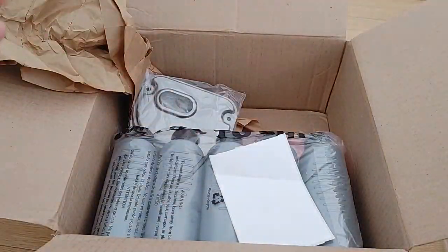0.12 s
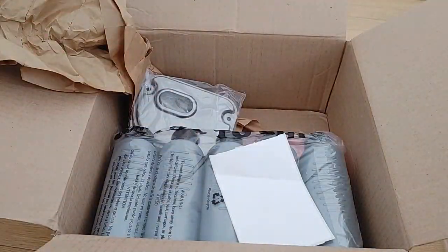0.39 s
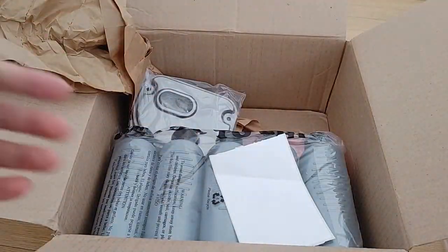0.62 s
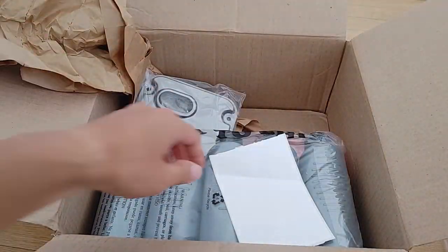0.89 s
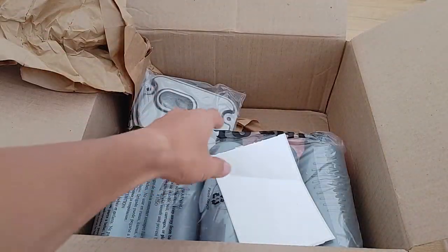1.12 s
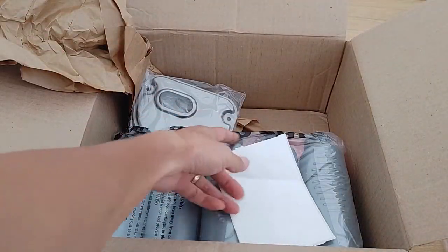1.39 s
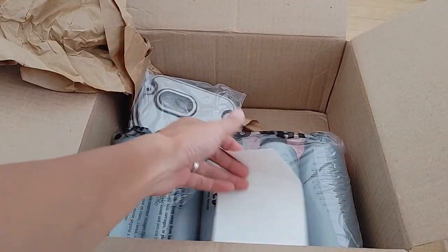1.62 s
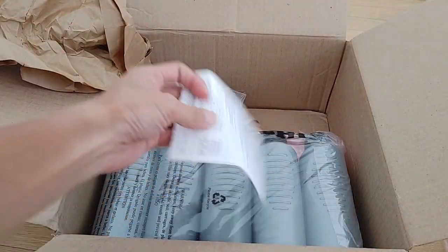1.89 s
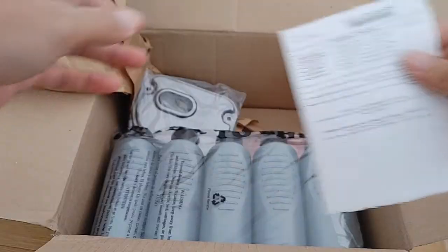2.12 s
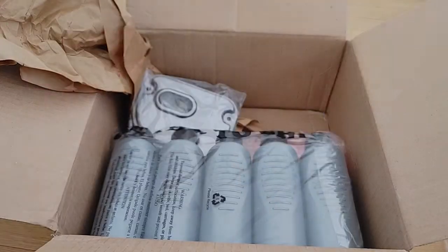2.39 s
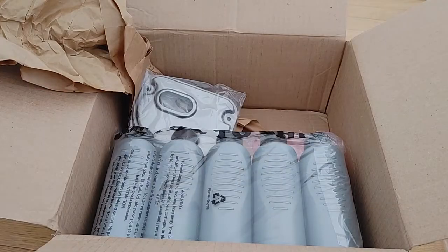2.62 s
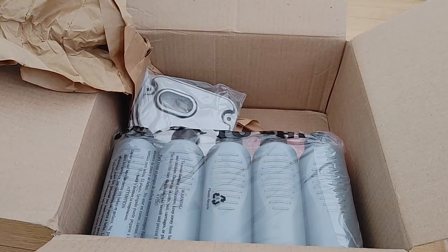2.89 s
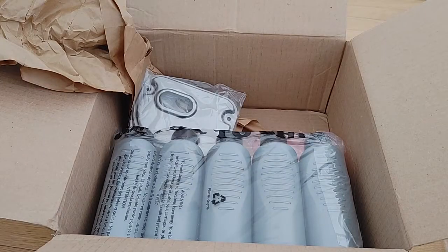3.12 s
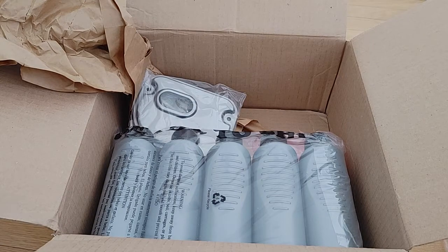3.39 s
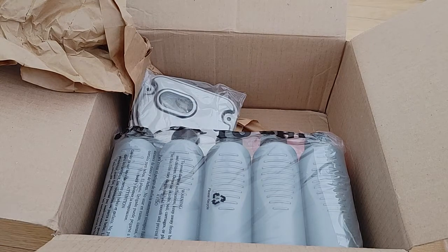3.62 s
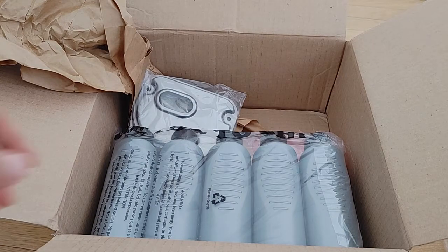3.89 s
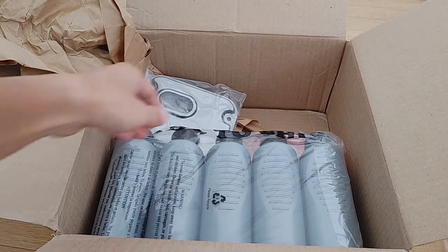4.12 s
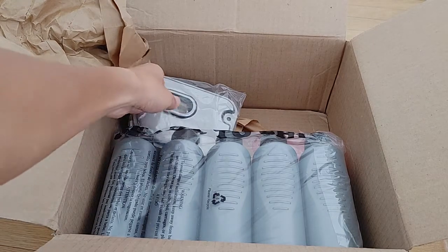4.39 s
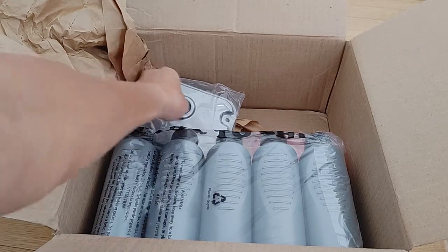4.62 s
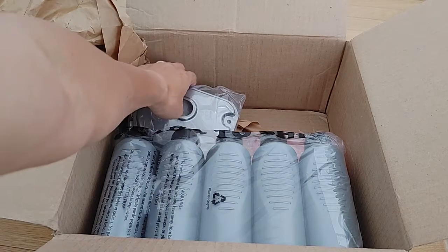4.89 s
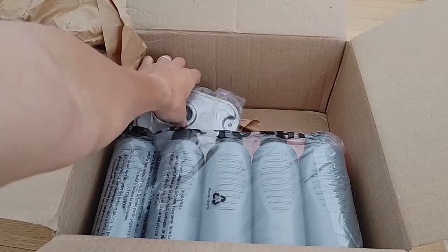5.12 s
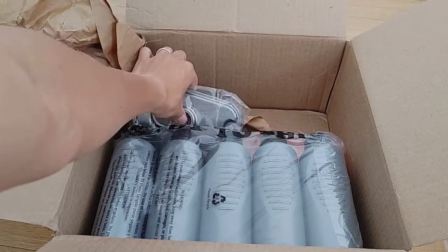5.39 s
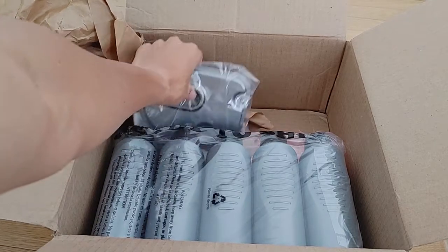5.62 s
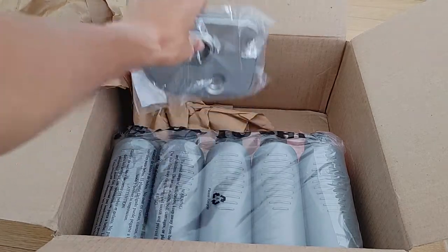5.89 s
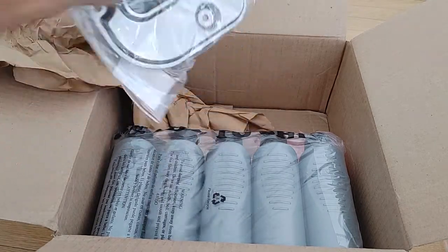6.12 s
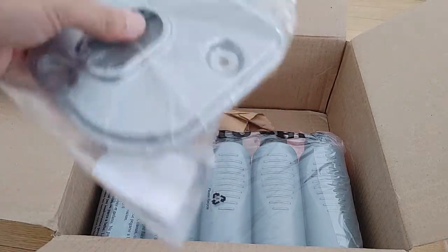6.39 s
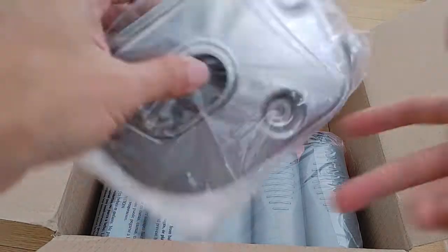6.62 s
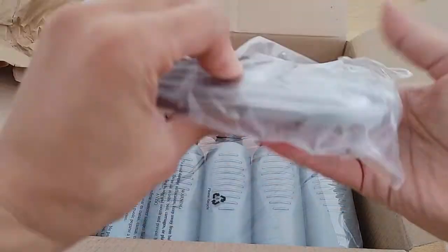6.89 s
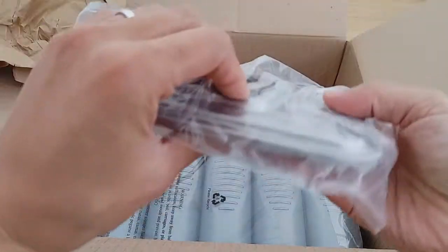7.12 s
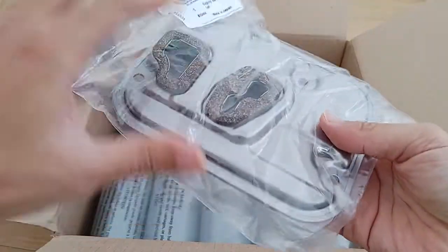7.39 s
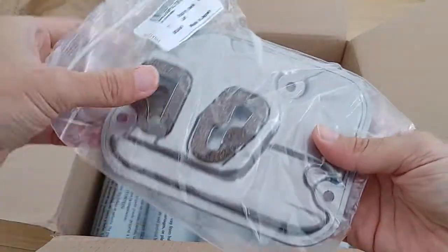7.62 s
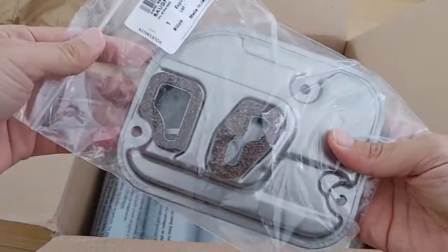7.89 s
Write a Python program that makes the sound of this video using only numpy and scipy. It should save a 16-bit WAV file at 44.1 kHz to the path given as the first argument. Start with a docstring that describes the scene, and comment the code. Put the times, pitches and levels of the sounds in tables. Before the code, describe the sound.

A close stereo microphone in a small room with quiet hush underneath. From 0 to 1.6 s thin paper crinkles in short, bright, dry bursts with sharp snaps, strongest around 0.4 and 1.25 s; two low, soft cardboard knocks come at about 0.55 and 0.6, and a weaker one near 1.7. The rustle fades by 2.3. In the lull, faint clicks sound further away at 2.5 and 2.85, then a clearer click with a brief scrape near 3.7. From 4.4 to 5.9 thin plastic crinkles more densely and fully, over resonant cardboard rubbing and hollow bumps, heaviest around 4.85 and 5.27, with a strong crackle at 5.8. It eases, and a low air puff passes at 6.3. From 6.5 to 8 plastic crinkles in separate bursts, with soft dull taps on the metal part, mainly 6.85 to 7.35, and a sharp snap at 7.73.

```python
"""Hands lift a paper slip and then a bagged metal part out of a cardboard box, close to a two-port microphone.
Paper crinkles and snaps first, as swarms of short resonant noise bursts, while knocks ring the box modes.
Then things set down further off click and scrape in a small room; bumps thump in decaying sine groups.
At the end fingertips ring the modes of the bagged part amid more crinkle. Throughout, rubbing rumbles as
resonated impulses, puffs of moved air press on the ports as low noise, and a quiet hush lies beneath."""
import sys
import numpy as np
from scipy import signal
from scipy.fft import rfft, irfft
from scipy.io import wavfile
from scipy.ndimage import uniform_filter1d

SR = 44100
rng = np.random.default_rng(int(sys.argv[2]) if len(sys.argv) > 2 else 0)


def volts_from_db(level):
    """Convert decibel levels to linear amplitude ratios."""
    exponent = np.asarray(level, float) / 20
    return 10 ** exponent


def generate_wav(signal):
    """Clip the signal to [-1, 1] and save it as 16-bit WAV at the path in sys.argv[1]."""
    frames = np.transpose(np.atleast_2d(signal))
    scaled = np.clip(frames, -1, 1) * 32767
    pcm = np.round(scaled).astype(np.int16)
    wavfile.write(sys.argv[1], SR, pcm)


N = 353241
T = np.arange(N) / SR


def evened(x):
    """Normalisation: scales to rms 1."""
    return x / np.sqrt(np.mean(x ** 2) + 1e-20)


def read(points, hz):
    """Linear interpolation of a spectrum on a log-frequency axis."""
    f, value = np.transpose(points)
    return np.interp(np.log(hz + 1), np.log(f + 1), value)


def curve(rows, column):
    """Linear interpolation of one table column, sample by sample."""
    rows = np.transpose(rows)
    return np.interp(T, rows[0], rows[column])


def add(mix, s, sound):
    """Superposition: lays a sound into a track at second s."""
    part = mix[..., round(s * SR):][..., :sound.shape[-1]]
    part += sound[..., :part.shape[-1]]


def band(x, lo_hz, hi_hz):
    """Band-pass filtering."""
    sos = signal.butter(3, [lo_hz, min(hi_hz, .45 * SR)], "bandpass", fs=SR, output="sos")
    return signal.sosfilt(sos, x)


def above(x, edge_hz):
    """Zero-phase high-pass with a soft edge; x minus it is the part under the edge."""
    return irfft(rfft(x) / (1 + (edge_hz / (np.fft.rfftfreq(N, 1 / SR) + 1)) ** 8), N)


def resonate(x, hz, width_hz):
    """Heterodyne resonator: shifts the curve hz down to zero, smooths, and shifts back."""
    turn = np.exp(2j * np.pi * np.cumsum(hz) / SR)
    r = np.exp(-np.pi * width_hz / SR)
    return 2 * (turn * signal.lfilter([1 - r], [1, -r], x / turn)).real


def sides(x, pan_db):
    """Level-difference panning: splits the left-right difference over both ports."""
    return x * volts_from_db(np.multiply.outer([.5, -.5], pan_db * np.ones(x.shape[-1])))


def strokes(rows, rise_db_per_s, fall_db_per_s):
    """Exponential envelopes: the power of each row swells up to its start, holds, then dies away."""
    step = T[::64]
    power = []
    for s, hold, db, *_ in rows:
        rise_db = rise_db_per_s * np.maximum(s - step, 0)
        fall_db = fall_db_per_s * np.maximum(step - s - hold, 0)
        power.append(volts_from_db(2 * (db - rise_db - fall_db)))
    return step, np.array(power) + 1e-14


def pair(spectrum_db, likeness):
    """Partial coherence: two-port noise of a given colour and likeness, rms 1."""
    hz = np.fft.rfftfreq(2048, 1 / SR)
    a, b, c, d = rng.standard_normal((N // 512 + 5, 1025, 4)).T
    same = np.clip(read(likeness, hz), -1, 1)[:, None]
    left = a + 1j * b
    right = same * left + np.sqrt(1 - same ** 2) * (c + 1j * d)
    z = np.array([left, right]) * volts_from_db(read(spectrum_db, hz))[:, None]
    return evened(signal.istft(z, nperseg=2048, noverlap=1536)[1][:, :N])


def crack(hz, noise, t60, q, wide):
    """Buckling crease as an excited resonator: a dying noise burst, partly ringing at one pitch."""
    t = np.arange(len(noise)) / SR
    burst = noise * volts_from_db(-60 * t / t60) * np.minimum(t / 0.00086, 1) ** 2
    ring = signal.lfilter(*signal.iirpeak(min(hz, .45 * SR), q, SR), burst)
    sound = evened(ring) + wide * evened(band(burst, 370, 15200))
    return sound / abs(sound).max()


# colour of the background noise: (frequency [Hz], relative density [dB])
HUSH_COLOUR = [(25, -31), (120, -24.5), (240, -26.5), (300, -15), (420, -26.5), (2400, -34.5), (7000, -48),
               (11000, -47.5), (16000, -33)]
# likeness of the two ports: (frequency [Hz], left-right likeness [0 to 1])
HUSH_LIKENESS = [(40, 0.6), (300, 0.7), (2400, 0.0357)]


def hush(level_db=-68.5):
    """Stationary noise, coherent between the ports in the bass and nearly independent in the treble."""
    return volts_from_db(level_db) * pair(HUSH_COLOUR, HUSH_LIKENESS)


# how fast the room dies away: (frequency [Hz], t60 [s])
ROOM_DECAY = [(500, 0.3), (4600, 0.27), (12000, 0.045)]


def room(x):
    """Reverberation by sparse random-sign echoes, one in every 20 samples, each band dying at its own speed."""
    echoes = np.zeros((2, SR // 2))
    at = np.arange(200, SR // 2 - 20, 20)
    at = at + rng.integers(0, 20, (2, len(at)))
    np.put_along_axis(echoes, at, rng.choice([-1., 1.], at.shape), 1)
    hz, t, z = signal.stft(echoes, SR, nperseg=256)
    decay = volts_from_db(-60 * t / read(ROOM_DECAY, hz)[:, None])
    tail = signal.istft(z * decay, SR, nperseg=256)[1]
    return signal.fftconvolve(x[None], tail / np.linalg.norm(tail[0]), axes=1)[:, :N]


# air pushed on the ports: (start [s], hold [s], level [dB])
AIR_PUFFS = [(.56, 0.16, -63), (1.55, 0.19, -67.5), (4.74, 0.24, -68.5), (6.12, .14, -61.5),
             (6.28, 0.066, -49.5), (7.42, 0.5, -73.5)]


def puffs():
    """Pressure fluctuation of moved air: lumpy low-frequency noise, stronger on the right port."""
    step, power = strokes(AIR_PUFFS, rise_db_per_s=305, fall_db_per_s=271)
    air = pair([(15, -23), (40, -14.5), (100, -5.0), (140, -7.5), (300, -52.5)], [(20, 1.0), (100, 0.68)])
    return sides(np.interp(T, step, np.sqrt(power.sum(0))) * air, -7)


# things set down further off: (time [s], level [dB], pitch [Hz], wide-band share [ratio],
# level of the scrape that follows [dB], scrape length [s])
SET_DOWNS = [(2.504, -46.5, 2000, 0.063, -21, 0.069), (2.849, -37, 8600, 0.027, -48, 0.017),
             (3.674, -18.5, 2500, 4.5, -19, 0.14), (3.863, -48.5, 1900, 0.15, -5.5, 0.041)]


def far_clicks():
    """Impact, then friction: a click and a short dying scrape of the same colour that dulls as it fades."""
    out, t = np.zeros((2, N)), np.arange(SR // 4) / SR
    noises = rng.standard_normal((len(SET_DOWNS), 3, SR // 4))
    for (s, db, hz, wide, scrape_db, length), noise in zip(SET_DOWNS, noises):
        click = crack(hz, noise[0], 0.013, 12.0, wide)
        scrape = np.array([evened(crack(hz, n, 2.3, 1.4, wide)) for n in noise[1:]])
        scrape += (volts_from_db(-60 * t) - 1) * band(scrape, 6200, 20000)  # treble goes first
        fade = volts_from_db(scrape_db - 14 * t / length) / (1 + (t / length) ** 10)
        add(out, s, volts_from_db(db) * (click + scrape * fade))
    return out


# knocks on the box: (time [s], level [dB], frequency the blow excites most [Hz])
BOX_KNOCKS = [(.551, -4, 266), (0.599, -10, 300), (1.717, -21, 493)]
# modes of the box: (frequency [Hz], level [dB], t60 [s])
BOX_MODES = [(175.6, -1, 0.18), (238.8, -1, 0.17), (319.8, 1, 0.2), (357.3, 4.5, 0.1), (394, 14, 0.034),
             (501, 5.5, 0.14), (1120, 19.5, 0.026)]


def knocks():
    """Modal superposition: a soft blow rings the box modes near the pitch it excites most."""
    out, t = np.zeros(N), np.arange(SR // 2) / SR
    for s, db, best_hz in BOX_KNOCKS:
        ring = np.zeros(len(t))
        for hz, mode_db, t60 in BOX_MODES:
            off_db = 17.2 * np.log2(hz / best_hz) ** 2
            ring += volts_from_db(mode_db - off_db - 60 * t / t60) * np.sin(2 * np.pi * hz * t)
        add(out, s, volts_from_db(db) * ring * np.minimum(t / 0.0047, 1) / abs(ring).max())
    return sides(out, -0.51)


# each drag of hand or part along the box: (start [s], hold [s], drag strength [dB], panel pitch [Hz])
BOX_DRAGS = [(0, 1.5, -58.5, 354), (1.55, 0.089, -52.5, 300), (1.8, 0.12, -56.5, 300),
             (2.35, 0.34, -59.5, 720), (2.62, 0.29, -58, 730), (3.56, 0.3, -62, 410),
             (4.1, 0.053, -62, 700), (4.43, 0.18, -43, 555), (4.68, 0.19, -37.5, 617),
             (5.04, .12, -42.5, 572), (5.19, 0.118, -38.5, 624), (5.37, 0.07, -38.5, 601),
             (5.535, 0.12, -39, 560), (5.73, 0.086, -41, 560), (5.92, 0.5, -54, 349),
             (6.59, 0.035, -45, 700), (6.7, 0.034, -44, 750), (6.84, 0.16, -46, 753), (7.1, 0.32, -52, 780),
             (7.49, 0.13, -56, 300), (7.66, 0.035, -49, 850), (7.77, 0.16, -53.5, 251)]


def rumble(per_s=400, spread_db=3, lifted_s=6.66, lifted_db=6):
    """Friction-driven resonance: rubbing makes the box air hum; the panel takes over as it gets harder."""
    size = volts_from_db(spread_db * np.minimum(rng.exponential(1, N), 3))
    rub = size * rng.choice([-1, 1], N) * (rng.random(N) < per_s / SR)
    rub = rub + 0.5 * rub.std() * rng.standard_normal((2, N))
    step, power = strokes(BOX_DRAGS, rise_db_per_s=703, fall_db_per_s=147)
    level_db = np.interp(T, step, 10 * np.log10(power.sum(0)))
    # the panel pitch moves with the grip
    pitch = np.interp(T, step, np.array(BOX_DRAGS)[:, 3] @ power / power.sum(0))

    def ringing(hz, width_hz):
        """Two resonators in cascade, rms 1."""
        return evened(resonate(resonate(rub, hz, width_hz), hz, 3 * width_hz))

    panel, air = ringing(pitch, 110), ringing(295 + 0 * T, 40)
    body = evened(band(rub, 151, 550))
    # once the part is held clear of the box its panel rings freer and the walls shake less
    lifted = volts_from_db(lifted_db * (T > lifted_s))
    hard = volts_from_db(level_db + 48.5)
    mix = 0.46 * hard ** 0.66 * lifted * panel
    mix = mix + 0.15 * air / np.sqrt(hard)
    mix = mix + 0.24 * hard ** 0.25 * body / lifted
    return volts_from_db(level_db) * mix


# fingers and the part bump hollow walls: (time [s], level [dB], pitch [Hz])
WALL_BUMPS = [(4.329, -54, 290), (4.451, -34, 570), (4.516, -25.5, 522), (4.795, -15.5, 348),
              (4.833, -10.5, 443), (4.863, -8, 430), (5.249, -16.5, 539), (5.29, -13.5, 598),
              (5.612, -23.5, 613), (5.815, -23.5, 642), (5.833, -22, 507)]


def thumps(t60=0.033):
    """Beating of close partials: each bump swells, then rings with overtones and the lowest wall mode."""
    out, t = np.zeros(N), np.arange(6000) / SR
    wall_hz, _, wall_t60 = BOX_MODES[0]
    for (s, db, hz), luck in zip(WALL_BUMPS, rng.random((len(WALL_BUMPS), 5))):
        hard = volts_from_db(.5 * (db + 13.0))  # harder bumps wake the overtones more
        # (frequency ratio, share)
        group = ((1, 1), (.78, .5), (1.42, .5),
                 (2.2 + 0.8 * luck[0], 0.014 * hard), (2.24 + luck[1], 0.16 * hard))
        sound = sum(share * np.sin(2 * np.pi * (ratio * hz * t + u)) for (ratio, share), u in zip(group, luck))
        swell = (0.6 + 0.38 * max(db + 15.0, 0)) / hz  # the heaviest lean in slowly
        sound *= volts_from_db(-60 * np.maximum(t - swell, 0) / t60) * np.minimum(t / swell, 1) ** 2
        wall = 0.048 * (500 / hz) ** 3 * volts_from_db(-60 * t / wall_t60) * np.sin(2 * np.pi * wall_hz * t)
        add(out, s, volts_from_db(db) * (sound / abs(sound).max() + wall))
    return sides(out, 3.8)


# fingers tap the bagged metal part: (time [s], level [dB])
PART_TAPS = [(6.529, -44), (6.851, -32), (6.891, -32.5), (6.93, -31.5), (6.962, -35), (6.992, -35),
             (7.212, -40.5), (7.25, -34.5), (7.264, -36), (7.354, -34.5), (7.68, -36.5)]
# modes of the part: (nominal frequency [Hz], level [dB])
PART_MODES = [(775, 3), (1350, -14.5)]


def taps(swell_s=0.0057, spread=0.062):
    """Damped modal excitation: a soft fingertip swells and damps the modes; the grip shifts them a little."""
    out, t = np.zeros(N), np.arange(3000) / SR
    envelope = (t / swell_s * np.exp(1 - t / swell_s)) ** 2
    for (s, db), luck in zip(PART_TAPS, rng.uniform(-1.18, 1, (len(PART_TAPS), 1))):
        shift = 1 + spread * luck
        ring = sum(volts_from_db(mode_db) * np.sin(2 * np.pi * hz * shift * t) for hz, mode_db in PART_MODES)
        add(out, s, volts_from_db(db) * ring * envelope)
    return out


# creases that buckle and ring at a pitch: (time [s], level [dB], pitch [Hz])
RINGING_CREASES = [(0.032, -39, 1860), (0.1219, -33, 5500), (0.278, -36.5, 1880), (0.806, -27, 9400),
                   (1.0039, -25.5, 3670), (1.095, -29, 3800), (1.4152, -28, 1760), (1.427, -27.5, 9000),
                   (3.755, -34.5, 2800), (4.4228, -37.5, 2320), (5.2558, -19.5, 3500),
                   (5.8125, -14.5, 1550), (5.836, -18, 1190), (6.5899, -28, 2630), (6.74, -23.5, 4520),
                   (7.065, -33, 1890)]
# creases that only click, wide and short: (time [s], level [dB])
CLICKING_CREASES = [(0.195, -37), (0.2997, -35), (0.3203, -33.5), (0.3652, -30.5), (0.3935, -21.5),
                    (0.4944, -36), (0.6808, -31), (0.7712, -33.5), (0.9278, -31.5), (1.0724, -32.5),
                    (1.2307, -26), (1.2585, -35.5), (1.265, -16.5), (1.3047, -25), (1.3716, -34),
                    (1.516, -26), (1.5623, -28.5), (4.5145, -36), (4.5325, -22), (4.5464, -24),
                    (4.5718, -18), (4.9208, -22.5), (5.3135, -18), (5.6196, -28), (5.696, -23.5),
                    (5.9945, -34.5), (6.1435, -39), (6.324, -33), (6.5122, -24.5), (6.637, -29),
                    (6.7206, -25), (6.787, -32), (6.8349, -29), (6.9345, -21.5), (6.992, -21.5),
                    (7.0236, -33), (7.1994, -25.5), (7.26, -22), (7.3368, -27), (7.5318, -33.5),
                    (7.6735, -30), (7.732, -12), (7.8298, -23.5), (7.9222, -24.5), (7.939, -29),
                    (7.9798, -29)]


def snaps(scatter_db=2):
    """Buckling instability: large creases one by one, each a sharp tick over a softer, longer flutter."""
    out = np.zeros((2, N))
    octaves = rng.uniform(-0.57, 1.0, len(CLICKING_CREASES))
    # (time [s], level [dB], pitch [Hz], sharpness of the ring [Q])
    rows = [(s, db, 4000 * 2 ** u, 2.0) for (s, db), u in zip(CLICKING_CREASES, octaves)]
    rows += [(*row, 8.0) for row in RINGING_CREASES]
    for (s, db, hz, q), noise in zip(rows, rng.standard_normal((len(rows), 2, 1024))):
        tick = crack(hz, noise[0], 0.012, 4.9, min(hz / 5000, 1))
        flutter = crack(hz, noise[1], 0.055, q, 0.5)
        pan_db = scatter_db * noise[0, -1]  # scattered around the hands
        add(out, s, sides(volts_from_db(db) * (tick + 0.071 * q * flutter), pan_db))
    return out


# each grip on paper or bag sets off a burst of crinkle:
# (start [s], hold [s], level [dB], fullness below 2.5 kHz [dB])
CRINKLE_GRIPS = [(0, 0.047, -59.5, -6.5), (0.113, 0.098, -53, -12), (0.263, 0.051, -53.5, -10),
                 (0.364, 0.058, -49, -41.5), (0.486, 0.071, -55.5, -10.5), (0.682, 0.19, -61, -9),
                 (0.76, 0.42, -50, -13), (1.223, 0.096, -46.5, -19.5), (1.413, 0.18, -52.5, -9.5),
                 (1.657, 0.13, -65.5, 2.5), (1.87, 0.1, -63, -1), (2.273, 0.093, -74, -14),
                 (2.606, 0.16, -82, 7.5), (3.322, 0.047, -78, 0), (4.439, 0.12, -48.5, 3.5),
                 (4.522, 0.035, -38.5, 4), (4.673, 0.12, -48, 4.5), (4.826, 0.072, -44, 7.5),
                 (5.034, 0.067, -54, 7.5), (5.167, 0.17, -41.5, 2), (5.407, 0.038, -42.5, 6),
                 (5.523, 0.25, -45, 4), (5.819, 0.0034, -32, 2), (5.98, 0.2, -59, -2.5),
                 (6.139, 0.019, -46, -6.5), (6.313, 0.0079, -56, -1.5), (6.59, 0.0098, -39.5, -5.5),
                 (6.701, 0.076, -43, -6), (6.847, 0.18, -49.5, -1), (7.105, 0.16, -50, -11),
                 (7.253, 0.18, -52.5, -4.5), (7.538, 0.01, -47.5, -6.5), (7.634, 0.11, -46, -8),
                 (7.807, 0.036, -44, -2), (7.91, 0.11, -53.5, -7)]
# sheet or bag slides along a surface: (from [s], to [s])
SLIDE_SPAN = (3.6, 5.95)


def crinkle(per_s=1400, spread_db=5.5, slide_per_s=3000, slide_spread_db=4.8,
            clump_db=2.0, spot_db=5.0, count=16):
    """Crackling noise: swarms of tiny creases, each spot with its own pitch and busy moments.

    Sliding makes the creases denser and more even."""
    busy = uniform_filter1d(rng.standard_normal((N // 128 + 1, count + 1)), 6, 0)
    slow = uniform_filter1d(uniform_filter1d(busy, 10, 0), 3, 1)
    spot, out = rng.integers(0, count, N), np.zeros((2, N))
    slide = (T > SLIDE_SPAN[0]) & (T < SLIDE_SPAN[1])

    # low spots are more even
    uneven_db = np.where(slide, slide_spread_db, spread_db) * (1 + spot / count) / 2
    happens = rng.random(N) < np.where(slide, slide_per_s, per_s) / SR
    size = volts_from_db(uneven_db * np.minimum(rng.exponential(1, N), 4)) * happens
    size /= np.where(slide, size[slide].std(), size[~slide].std())
    block = np.arange(N) // 128
    common_db = clump_db * evened(busy)[block, -1]
    own_db = spot_db * np.minimum(evened(slow), 1.5)[block, spot]
    size *= volts_from_db(common_db + own_db)

    for k, hz in enumerate(np.geomspace(1200, 13000, count)):
        grains = np.array([crack(hz, n, 0.012, 12, 0.6) for n in rng.standard_normal((2, 512))])
        out += signal.oaconvolve((size * (spot == k))[None], grains, axes=1)[:, :N]

    # all spots together sound evenly over the range
    z = rfft(out)
    smooth_power = uniform_filter1d((abs(z) ** 2).mean(0), 4000)
    out = above(irfft(z / np.sqrt(smooth_power), N), 620)
    high = above(out, 2500)
    step, power = strokes(CRINKLE_GRIPS, rise_db_per_s=793, fall_db_per_s=186)
    full = volts_from_db(2 * np.array(CRINKLE_GRIPS)[:, 3]) @ power
    low_gain = np.interp(T, step, np.sqrt(full))
    high_gain = np.interp(T, step, np.sqrt(power.sum(0)))
    return low_gain * evened(out - high) + high_gain * high / band(high, 2500, 7500).std()


# where the hands are: (time [s], delay of the left port [samples], left-right difference [dB],
# sheen in the top treble [dB])
HAND_PLACE = [(0, 17, -6, -27), (1.3, 23.5, -8, -9), (1.7, -9.5, -2.5, -7.5), (2.8, 21, -5.5, -7.5),
              (4.1, 20.5, -4, -0.5), (4.3, -6, -0.5, -8.5), (5.9, -3, -0.5, -18.5), (7.2, -2, -2.5, -13.5),
              (8, -3, 0.5, -38)]


def scene():
    """Superposition of all sources with port level and path differences, room reflections and hush."""
    rustle = crinkle() + far_clicks()
    low = above(rumble() + thumps() + knocks(), 69)
    creases = snaps()
    sheen = volts_from_db(curve(HAND_PLACE, 3))
    bright = rustle + (sheen - 1) * above(rustle, 8520)
    # sharp creases take half the sheen in dB
    bright = bright + creases + (np.sqrt(sheen) - 1) * above(creases, 12000)
    wet = room(volts_from_db(-12) * bright.mean(0))
    # long bass waves reach both ports alike, also from the walls
    low = low + volts_from_db(-8.5) * room(low.mean(0))[0] + taps()
    left, right = sides(bright + wet, curve(HAND_PLACE, 2)) + low
    delay = np.round(curve(HAND_PLACE, 1)).astype(int)
    late = np.clip(np.arange(N) - delay, 0, N - 1)
    return np.array([left[late], right]) + puffs() + hush()


def roll_off(x):
    """The treble ends steeply here."""
    return signal.sosfilt(signal.butter(12, 16970, fs=SR, output="sos"), x)


# microphone response: (frequency [Hz], gain [dB])
MIC_RESPONSE = [(2500, 2), (6800, 5), (7900, -1.5), (9500, 5), (13000, 3), (15750, -2.5), (16000, -35.5)]


def record(dry):
    """Linear filtering by the frequency response of the microphone."""
    gain = volts_from_db(read(MIC_RESPONSE, np.fft.rfftfreq(N, 1 / SR)))
    coloured = irfft(rfft(dry) * gain, N)
    return roll_off(coloured)


dry = scene()
out = record(dry)
generate_wav(out)
```